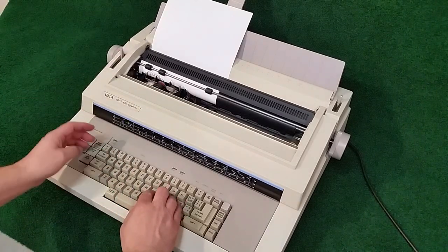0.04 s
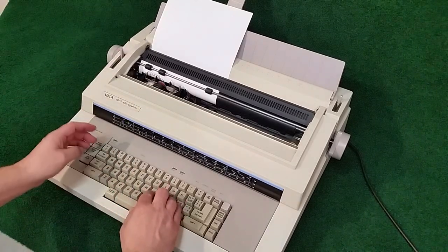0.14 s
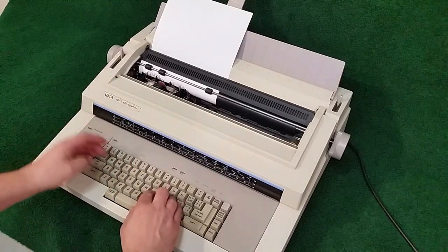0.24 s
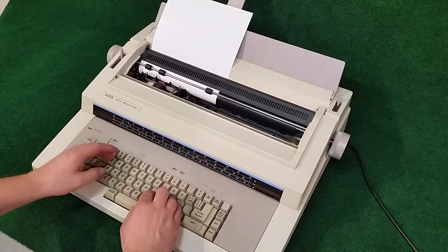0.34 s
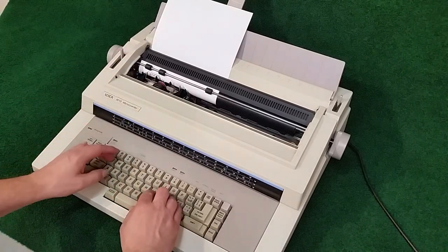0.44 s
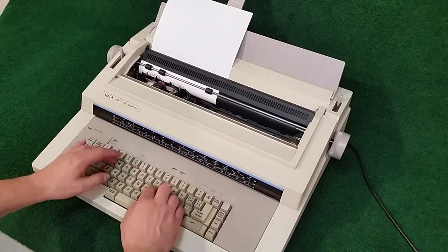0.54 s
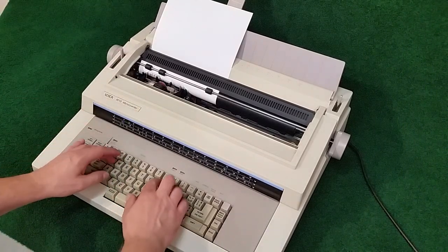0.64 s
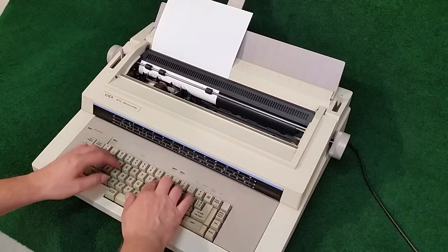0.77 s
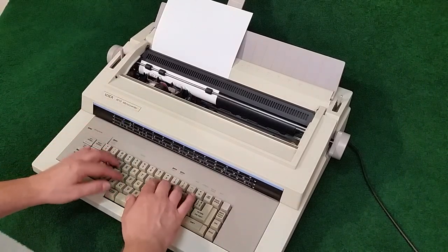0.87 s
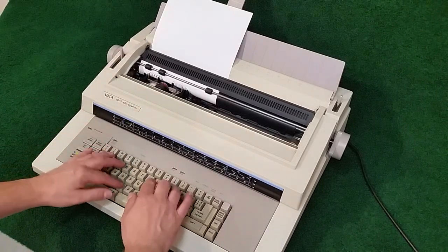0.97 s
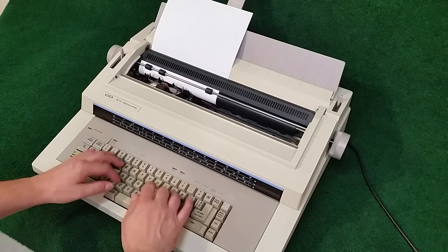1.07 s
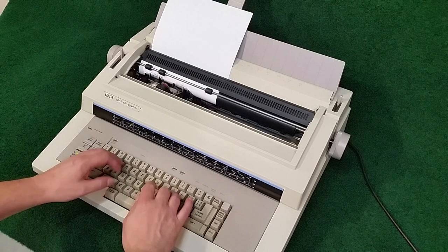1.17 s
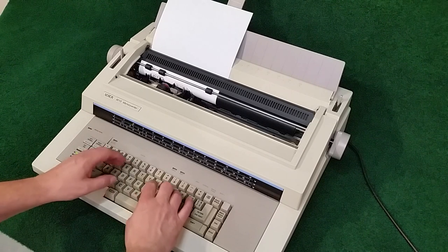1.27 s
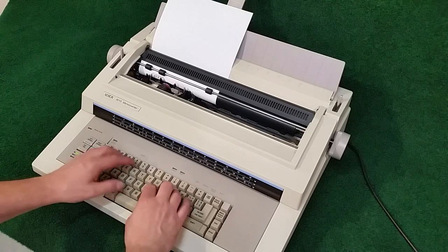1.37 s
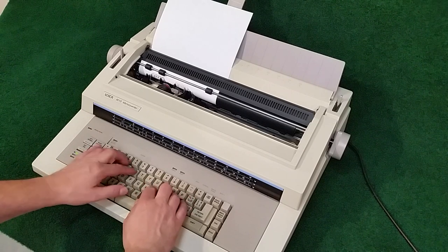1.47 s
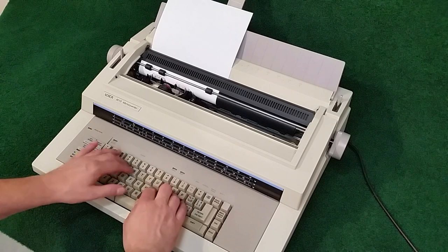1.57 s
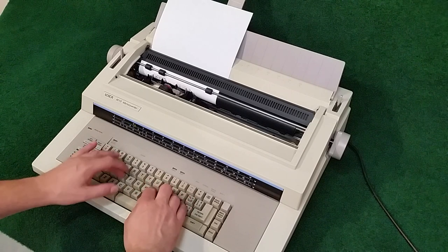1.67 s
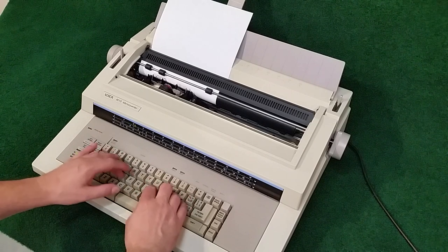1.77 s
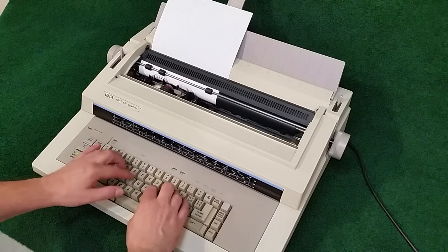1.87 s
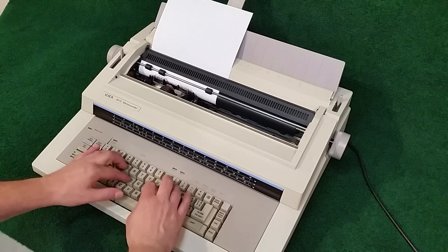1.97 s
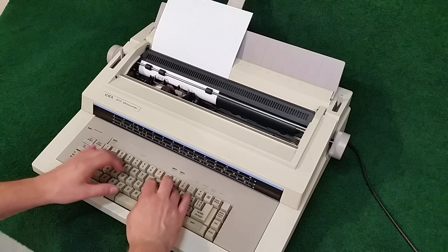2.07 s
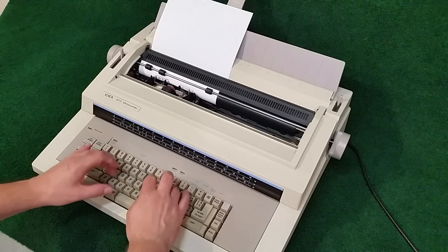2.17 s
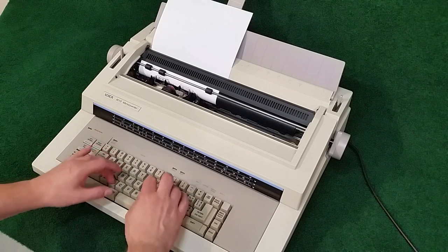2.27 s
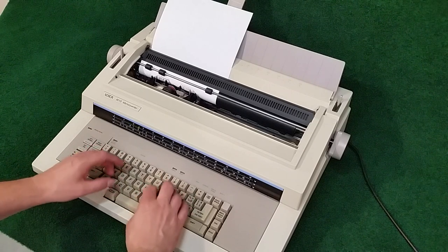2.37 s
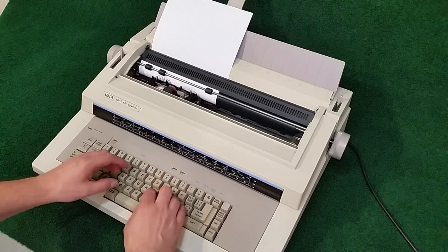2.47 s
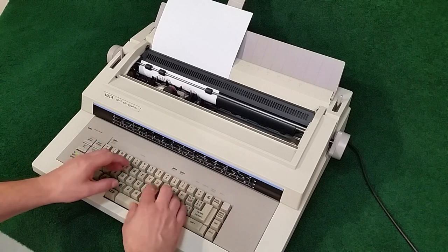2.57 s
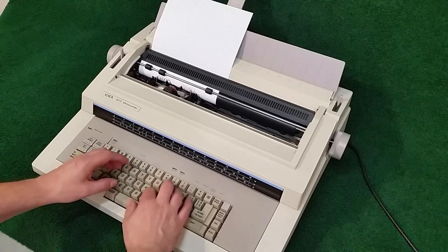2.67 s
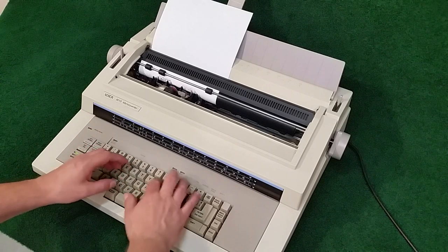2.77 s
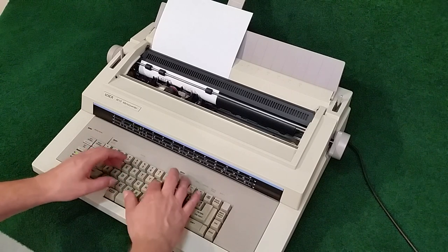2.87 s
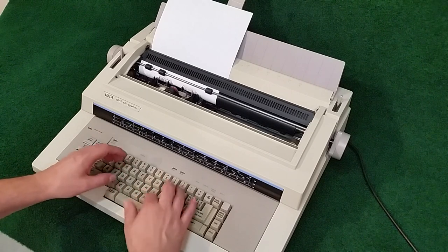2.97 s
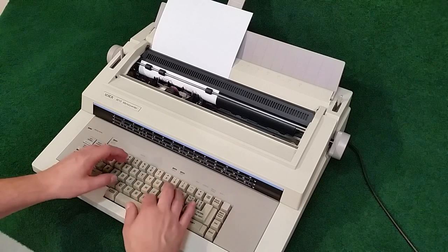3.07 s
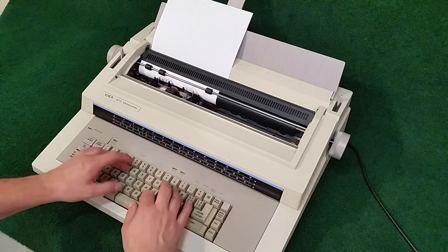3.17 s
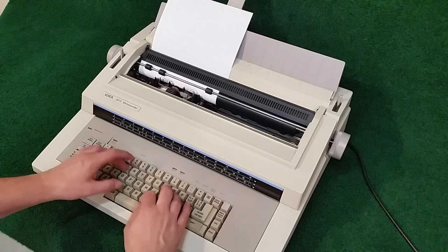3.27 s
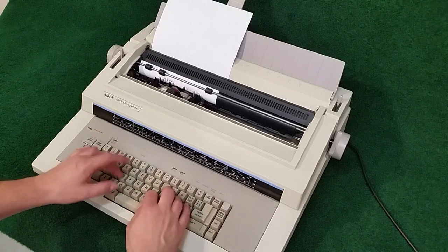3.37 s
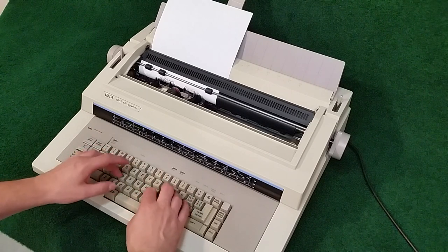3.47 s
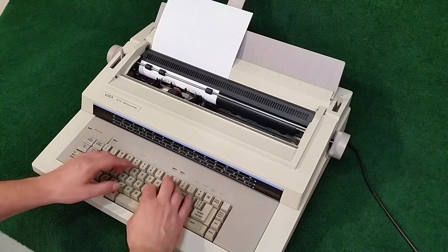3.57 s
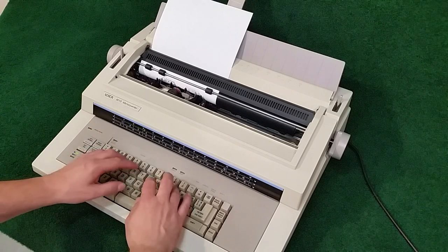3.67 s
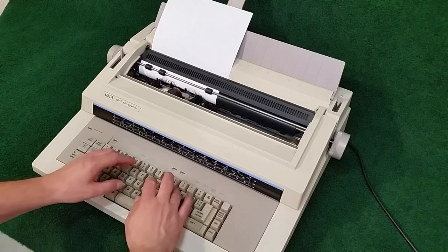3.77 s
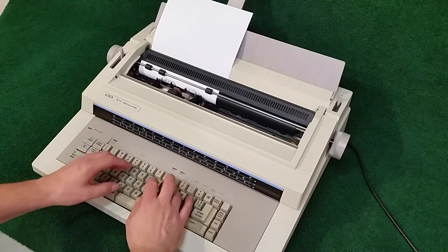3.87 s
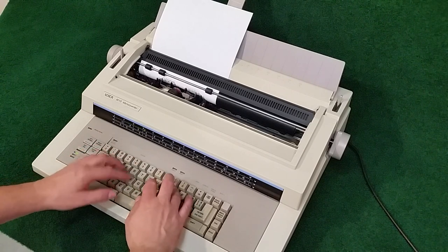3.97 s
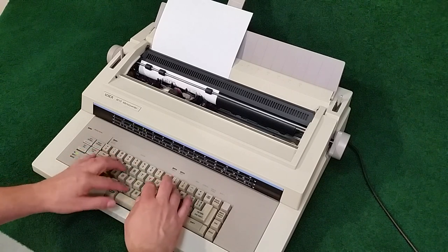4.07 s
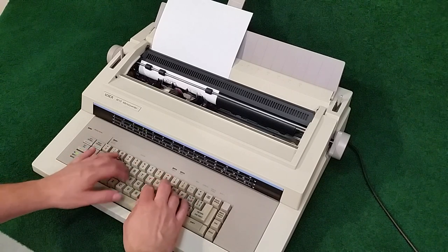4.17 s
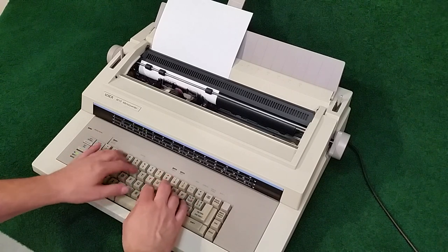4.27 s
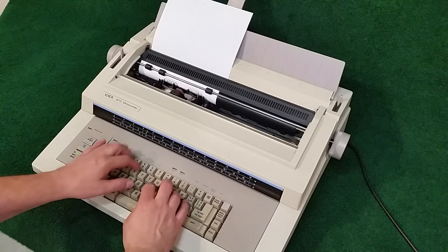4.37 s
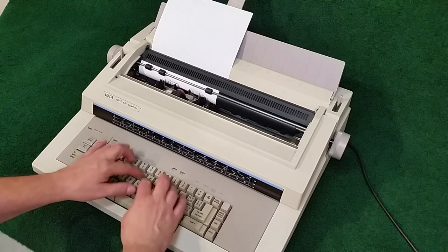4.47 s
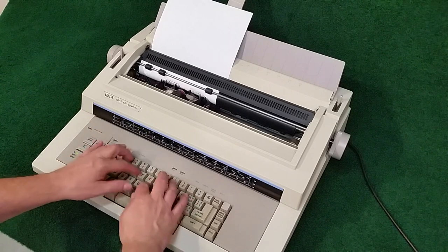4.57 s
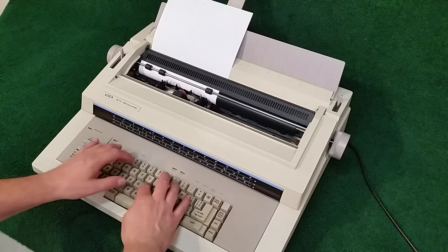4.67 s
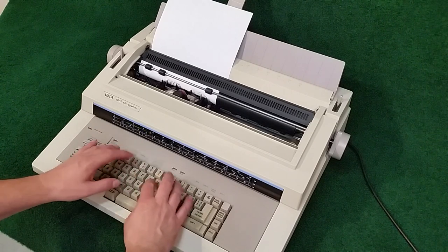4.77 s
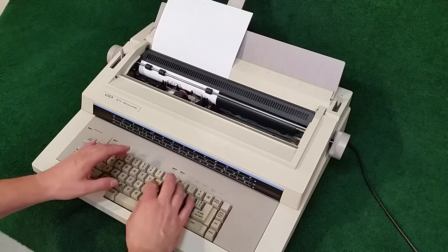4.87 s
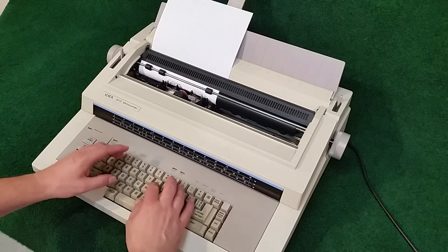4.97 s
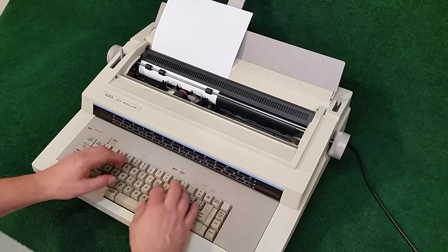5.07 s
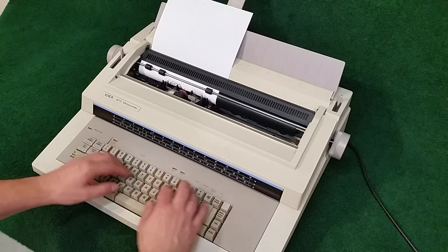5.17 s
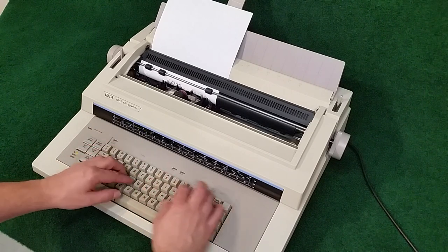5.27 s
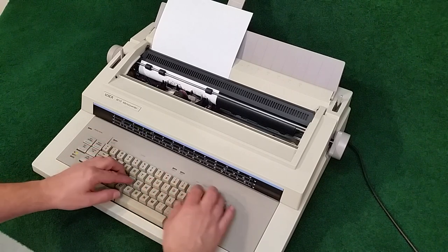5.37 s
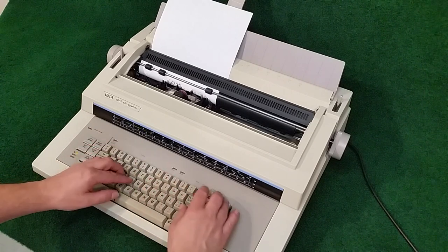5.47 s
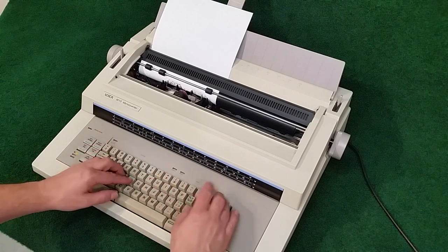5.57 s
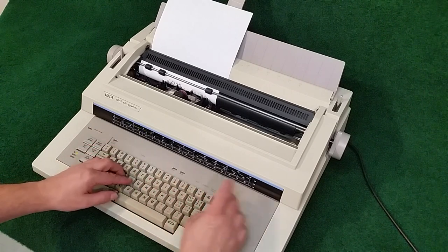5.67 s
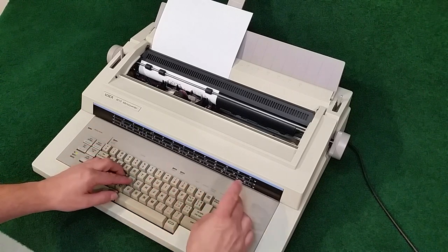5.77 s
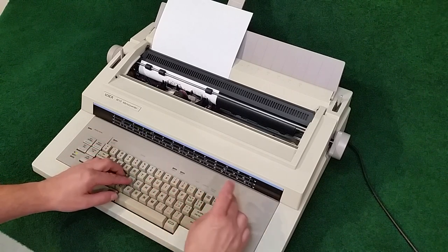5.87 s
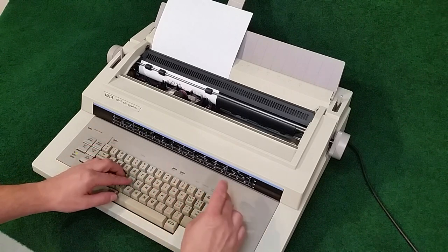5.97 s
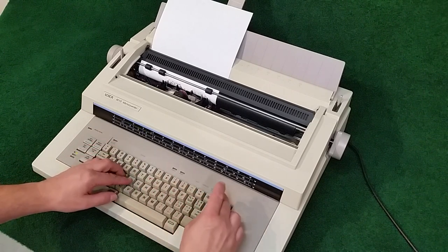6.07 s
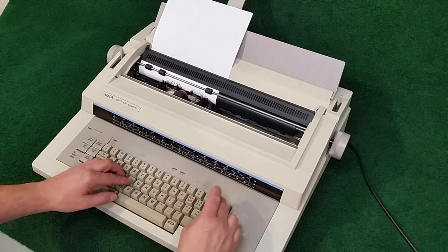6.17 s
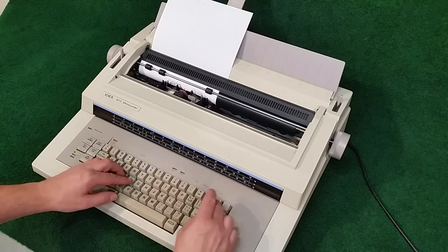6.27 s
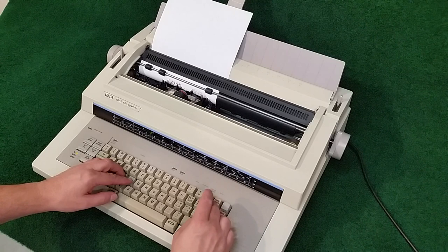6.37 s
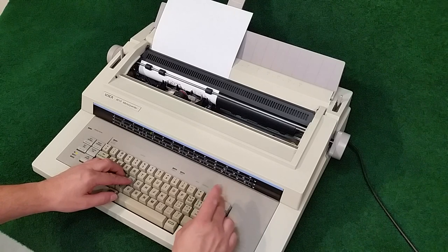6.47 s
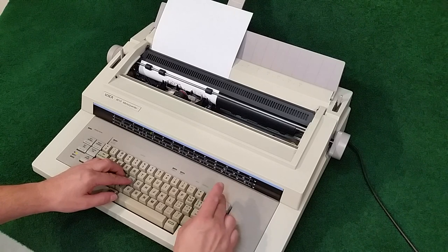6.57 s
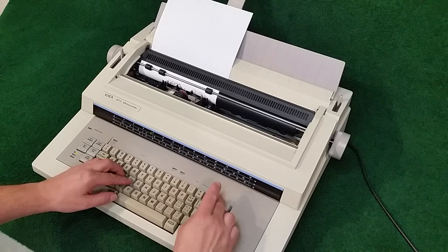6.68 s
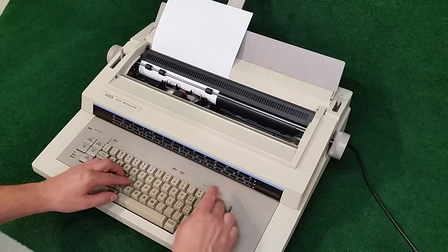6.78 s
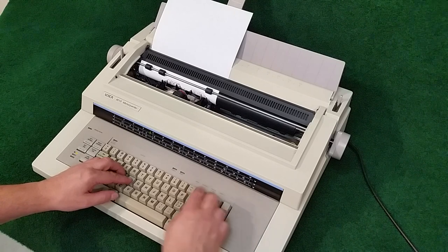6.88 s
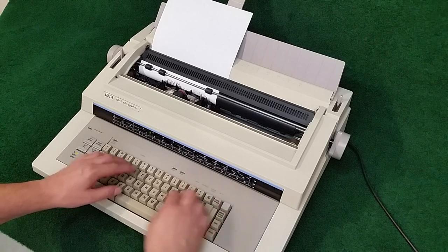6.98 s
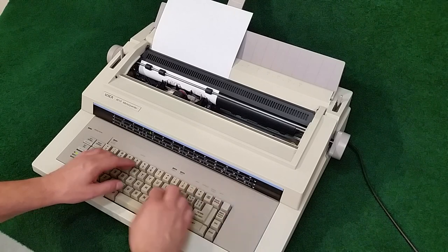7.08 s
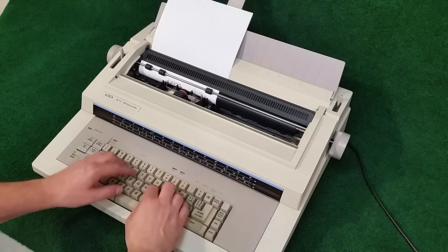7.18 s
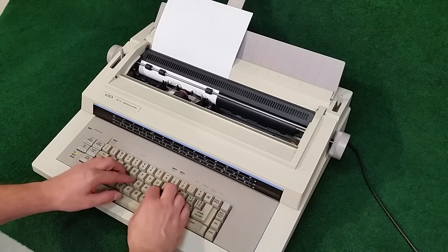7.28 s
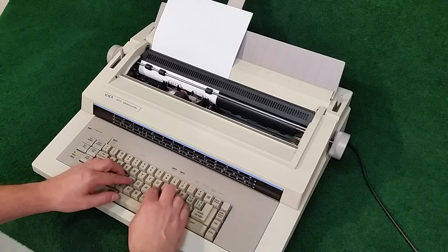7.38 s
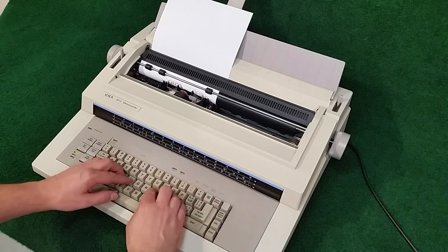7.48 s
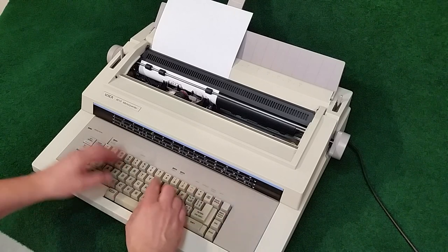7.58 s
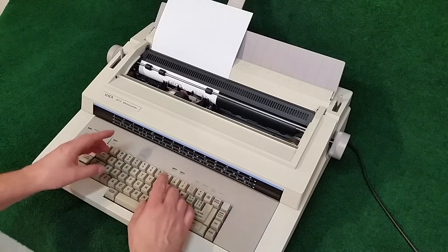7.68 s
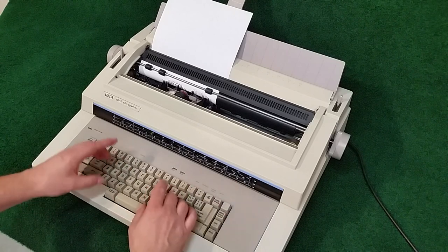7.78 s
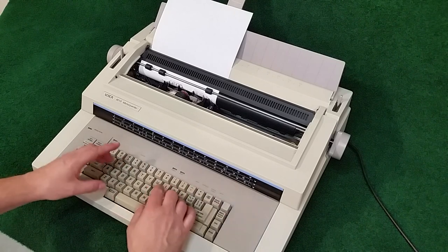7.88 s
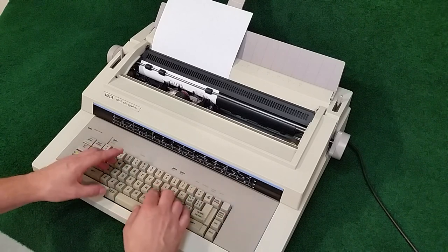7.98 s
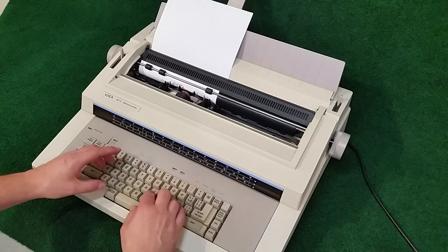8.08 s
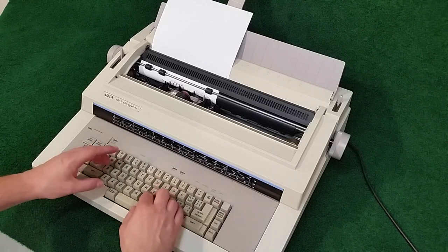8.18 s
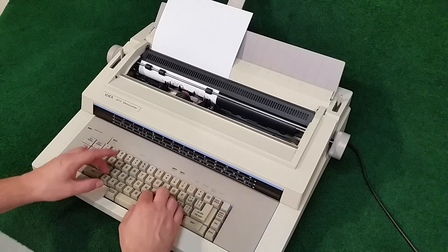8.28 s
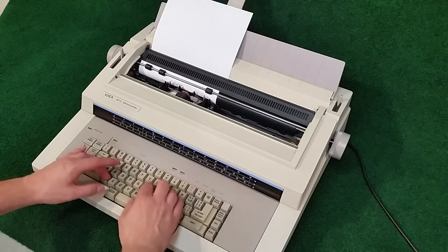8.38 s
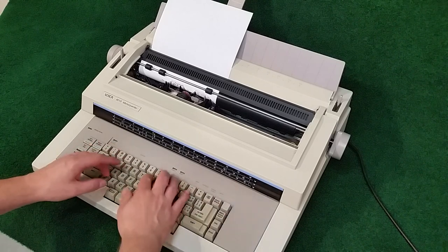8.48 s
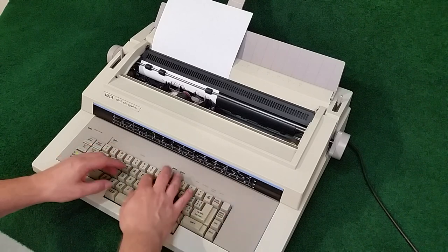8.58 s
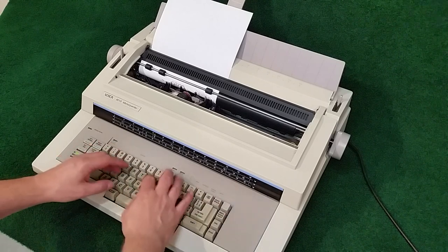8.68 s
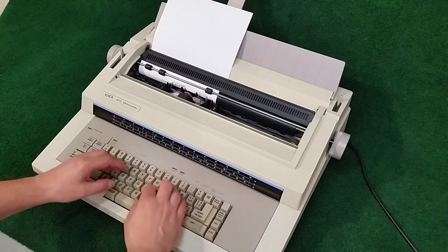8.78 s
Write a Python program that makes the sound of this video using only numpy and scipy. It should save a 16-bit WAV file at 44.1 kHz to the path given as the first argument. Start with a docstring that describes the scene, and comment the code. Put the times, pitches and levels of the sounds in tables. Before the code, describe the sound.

Close stereo sound of an electric typewriter in a small carpeted room. After a near-quiet start, letters strike in brisk, irregular runs, each a bright clack, hard crack and low case thud, with tiny motor whines between. Printing stops around five seconds; after a pause come light key knocks and a few scattered strikes. Low hum, soft air noise and faint hiss continue beneath.

```python
"""In a small carpeted room, two hands type on an electric daisy-wheel typewriter, close to two microphones.
For each letter the ribbon lifter clacks, the hammer cracks on the platen and rebounds, and the case thuds:
short bursts of noise ring resonances, and decaying sines make the crack. The wheel motor whines and keys knock.
The desk rumbles and a faint whistle passes once. Behind lie a low hum, a wavering drone, air noise,
and a band of hiss mostly in the left microphone."""
import sys
import numpy as np
from scipy import signal
from scipy.fft import rfft, irfft
from scipy.io import wavfile
from scipy.ndimage import uniform_filter1d

SR = 44100
rng = np.random.default_rng(int(sys.argv[2]) if len(sys.argv) > 2 else 0)


def transcribe(signal):
    """Save signal, clipped to [-1, 1], as a 16-bit WAV file at the path in sys.argv[1]."""
    frames = np.atleast_2d(signal).T
    limited = np.clip(frames, -1, 1)
    pcm = np.round(limited * 32767).astype(np.int16)
    wavfile.write(sys.argv[1], SR, pcm)


N = 389403
HZ = np.fft.rfftfreq(N, 1 / SR)


def amp(db):
    """Gain of a level in dB."""
    return 10 ** (np.asarray(db) / 20)


def evened(x):
    """Scales to rms 1, over both channels together."""
    return x / np.sqrt(np.mean(x ** 2) + 1e-20)


def read(points, hz):
    """Reads a spectrum table on a log-frequency axis."""
    f, value = np.transpose(points)
    return np.interp(np.log(hz + 1), np.log(f + 1), value)


def paired(x, likeness):
    """Makes the right channel share the left as two close microphones do."""
    left, other = rfft(x)
    same = np.clip(read(likeness, HZ), 0, 1)
    right = same * left + np.sqrt(1 - same ** 2) * other
    return irfft(np.array([left, right]), N)


# Likeness of the two microphones for the nearby machine; below 0 counts as 0: pitch_hz, likeness [0 to 1]
NEAR_LIKENESS = [(60, 0.96), (130, 0.96), (290, 1), (640, 0.87), (1410, 0.73), (3100, 0.24), (6820, -0.86),
                 (15000, -0.07)]


def noise(likeness=NEAR_LIKENESS):
    """White noise for the microphone pair."""
    return paired(rng.standard_normal((2, N)), likeness)


def resonator(x, hz, width):
    """One resonance of peak gain 1, its width in Hz."""
    return signal.lfilter(*signal.iirpeak(hz, hz / width, SR), x)


def ring(x, modes):
    """Sum of fixed resonances, each with its own peak level."""
    return sum(amp(db) * resonator(x, hz, width) for hz, width, db in modes)


def ring_twice(x, modes):
    """Sum of steeper resonances: each is followed by one twice as wide at the same pitch."""
    return sum(amp(db) * resonator(resonator(x, hz, width), hz, 2 * width) for hz, width, db in modes)


def bursts(times, db, t60, rise):
    """Envelope of blows that rise and die, at most 0.25 s long; level and t60 may differ per blow."""
    out, t = np.zeros(N), np.arange(SR // 4) / SR
    for s, level, fall in np.broadcast(times, amp(db), t60):
        part = out[round(s * SR):][:len(t)]
        shape = level * (1 - np.exp(-t / rise)) * amp(-60 * t / fall)
        part += shape[:len(part)]
    return out


def chatter(depth_db, size):
    """Noise whose loudness jumps from one contact of loose parts to the next; size in samples."""
    jumps = evened(uniform_filter1d(rng.standard_normal(N), size))
    return noise() * evened(amp(depth_db * jumps))


def lowpass(order, hz):
    """Butterworth low-pass sections."""
    return signal.butter(order, hz, fs=SR, output="sos")


# Letters struck on the platen, with relative levels:
# start_s, crack_db, wheel_rattle_db, cover_ring_db, lifter_lead_s (how much earlier it rises), lifter_clack_db
LETTERS = [(0.7541, -19, -32.5, -25, 0.026, -32), (0.9228, -18.5, -28.5, -13, 0.023, -24),
           (1.0319, -16, -26, -18, 0.022, -17), (1.1699, -16.5, -24.5, -38, 0.017, -18.5),
           (1.318, -20, -22, -11, 0.023, -13.5), (1.6705, -17, -28, -23, 0.023, -24.5),
           (1.7645, -16.5, -29, -12, 0.023, -17), (1.908, -13, -28, -13, 0.019, -21),
           (2.1177, -16, -21.5, -13.5, 0.023, -15.5), (2.2453, -14, -26, -28, 0.019, -19),
           (2.4501, -17, -23.5, -9, 0.024, -15.5), (2.8269, -17, -30, -25, 0.022, -28),
           (3.034, -17, -23, -30, .0232, -17.5), (3.1986, -13, -21.5, -24, 0.021, -20),
           (3.3835, -16.5, -22.5, -32.5, .0243, -15.5), (3.5877, -14, -23.5, -18, 0.022, -24),
           (4.1286, -18.5, -29.5, -31, 0.023, -25), (4.2784, -17, -26.5, -33, 0.024, -25),
           (4.411, -15, -22.5, -29, .0246, -16), (4.5029, -17.5, -25, -19.5, .0217, -17.5),
           (4.6881, -17.5, -20.5, -45, 0.023, -15.5), (4.781, -14.5, -24, -19, 0.022, -20.5),
           (7.2461, -20, -30.5, -18, 0.024, -24), (7.9664, -20, -33, -20, .0217, -33),
           (8.1529, -19, -23, -18.5, 0.023, -19), (8.5781, -19, -30, -20.5, 0.023, -27.5),
           (8.756, -17.5, -26, -13, 0.024, -17)]
# Partials of the crack, before the scatter from blow to blow: pitch_hz, level_db, t60_s
CRACK_PARTIALS = [(3152, -0.5, 0.0064), (2800, -14.5, 0.0023), (3720, -3, 0.0016), (4540, -4.5, 0.0029),
                  (5520, -11.5, 0.0022), (6940, -21.5, 0.00161), (10200, -5.5, .004), (13000, -3.5, 0.0039),
                  (14000, 4, 0.00203), (15300, 0, 0.0027)]
# The stop that the hammer falls back on: pitch_hz, width_hz, level_db
REST_MODES = [(2840, 70, -6), (1950, 150, 4), (5000, 550, -17.5)]
# The base, which thuds: pitch_hz, width_hz, level_db
BASE_MODES = [(91.6, 8.3, 6), (126.6, 47, 10.5), (143, 19, -1), (212.5, 7, -7), (297.5, 240, -7),
              (387, 150, -27.5)]
USUAL_CRACK_DB = -15
SNAP_DB, SNAP_GROWS = -18, 2  # crack partials from 8 kHz up at a usual blow; dB gained per dB of crack
REBOUND_S, REBOUND_DB, REBOUND_GROWS = 0.037, -23.5, 3.5  # delay; level and growth as for the snap
REBOUND_RATTLE_DB = -22  # relative to the ring of the rest
LINGER_DB, PANELS_DB, THUD_DB = -36.5, -26.5, -12  # alike for every blow


def cracks(s, crack_db, snap_db):
    """The hammer hits the platen: decaying sines, slightly retuned and rebalanced at each blow."""
    t, out = np.arange(600) / SR, np.zeros(N + 600)
    chance = rng.standard_normal((len(s), len(CRACK_PARTIALS), 2))
    for at, low_db, high_db, row in zip(s + 0.0003, crack_db, snap_db, chance):
        crack = 0
        for (hz, db, t60), (level_shift, pitch_shift) in zip(CRACK_PARTIALS, row):
            level_db = (low_db if hz < 8000 else high_db) + db + level_shift
            tone = np.sin(2 * np.pi * hz * (1 + 0.015 * pitch_shift) * t)
            crack = crack + amp(level_db - 60 * t / t60) * tone
        out[round(at * SR):][:600] -= crack * (1 - np.exp(-t / 0.00012))
    return out[:N]


def hammer():
    """A crack, early and lingering rattle, a later rebound on the rest, case ring and thud."""
    s, crack_db, rattle_db, covers_db = np.transpose(LETTERS)[:4]
    harder_db = crack_db - USUAL_CRACK_DB
    crack = cracks(s, crack_db, SNAP_DB + SNAP_GROWS * harder_db)
    rebound_db = REBOUND_DB + REBOUND_GROWS * harder_db
    shake = bursts(s + 0.00073, rattle_db + 4.0, 0.014, 0.00086)
    shake += bursts(s + 0.0058, rattle_db - 4.5, 0.036, 0.0021)  # a bounce soon after
    shake += bursts(s + 0.001, LINGER_DB, 0.26, 0.0094)
    shake += bursts(s + REBOUND_S, rebound_db + REBOUND_RATTLE_DB, 0.026, 0.0004)
    rest = bursts(s + REBOUND_S, rebound_db, 0.022, 0.00044)
    case = case_ring(s + 0.00056, PANELS_DB, covers_db, 0.051, 0.00101)
    thud = bursts(s + 0.0011, THUD_DB, 0.12, 0.017)
    rings = case + ring(rest * noise(), REST_MODES) + ring(thud * noise(), BASE_MODES)
    return crack + rattled(shake) + rings


# Colour of the rattling parts, only its shape counts: pitch_hz, level_db [dB per Hz]
RATTLE_COLOUR = [(410, -23), (700, -4), (1150, -20), (1330, 0.5), (1640, -7), (2000, 1), (2430, -4.5),
                 (2800, -3), (3070, -1), (5840, -15), (8210, -15), (10500, -1.5), (16000, -12)]


def rattled(envelope):
    """Loose metal and plastic parts chatter; the colour starts with the blow, not before it."""
    colour_db = np.maximum(read(RATTLE_COLOUR, np.abs(np.fft.fftfreq(4096, 1 / SR))), -80)
    log_gain = np.log(amp(colour_db))
    # the minimum-phase filter of this colour
    taps = np.fft.ifft(np.exp(np.conj(signal.hilbert(log_gain)))).real[:1024]
    shaken = envelope * chatter(1.5, size=60)
    return signal.oaconvolve(shaken, taps[None] / np.linalg.norm(taps), axes=1)[:, :N]


# Panels and covers of the case, for blows and the desk's buzz: pitch_hz, width_hz, level_db
CASE_MODES = [(578, 28, 2), (850, 20, -8), (1075, 15, -4.5), (1335, 51, 4), (2006, 86.4, 1),
              (2220, 114, -6), (2433, 53, -1), (2812, 70, 4), (3480, 97, -3), (3830, 120, -3),
              (4940, 75, -8.5)]


def case_ring(s, panels_db, covers_db, t60, rise):
    """Panels and covers differ in level; every blow rings all modes, each a little louder or softer at random."""
    shaking = noise()
    share_db = 3 * rng.standard_normal((len(s), len(CASE_MODES)))
    out = 0
    for mode, share in zip(CASE_MODES, share_db.T):
        part_db = panels_db if mode[0] < 1600 else covers_db
        out = out + ring(bursts(s, part_db + share, t60, rise) * shaking, [mode])
    return out


# Ribbon lifter dropping back, relative levels: start_s, clack_db, knock_db, clink_db
LIFTER_DROPS = [(1.4143, -17.5, -25, -26.5), (2.471, -15, -19, -32), (2.599, -31, -25, -47),
                (3.4007, -16, -27, -36), (3.7454, -35, -37, -48), (4.5995, -22, -22, -38),
                (4.8605, -28.5, -30, -19), (5.017, -32, -20, -50)]
# Small steel links of the lifter: pitch_hz, width_hz, level_db
LINK_MODES = [(10900, 490, -4.5), (10180, 478, -2), (8800, 1700, -21.5), (13000, 1100, -19),
              (14500, 1200, -23.5), (5760, 2460, -61.5), (3360, 3300, -16)]
# Key bed and frame: pitch_hz, width_hz, level_db
KEYBED_MODES = [(375, 138, 3.5), (528, 220, -1), (825, 99, -10), (1083, 68, -15)]
CLACK_T60, SECOND_TOUCH_S, SECOND_TOUCH_DB = 0.055, 0.0067, -17  # s; delay s; relative to the first touch
RISE_KNOCK_DB, RISE_CLINK_DB = -36, -27
USUAL_CLACK_DB = -19
LIFT_PANELS_DB = -25.5
LIFT_COVERS_DB, COVERS_GROW = -23, 0.61  # at a usual clack; dB gained per dB of clack


def lifter():
    """A bright clack in two quick touches, with case ring, a clink on the stop and a knock through the frame."""
    blow_s, lead_s, rise_db = np.transpose(LETTERS)[[0, 4, 5]]
    drop_s, drop_db, drop_knock_db, drop_clink_db = np.transpose(LIFTER_DROPS)
    rise_s = blow_s - lead_s
    s, clack_db = np.r_[rise_s, drop_s], np.r_[rise_db, drop_db]
    shake = bursts(s, clack_db, CLACK_T60, 0.00051)
    shake += bursts(s + SECOND_TOUCH_S, clack_db + SECOND_TOUCH_DB, CLACK_T60, 0.0008)
    knock = bursts(rise_s, RISE_KNOCK_DB, 0.12, 0.0035) + bursts(drop_s, drop_knock_db, 0.06, 0.001)
    clink = bursts(rise_s, RISE_CLINK_DB, 0.02, 0.00055) + bursts(drop_s, drop_clink_db, 0.031, 0.00048)
    covers_db = LIFT_COVERS_DB + COVERS_GROW * (clack_db - USUAL_CLACK_DB)
    case = case_ring(s, LIFT_PANELS_DB, covers_db, 0.081, 0.0014)
    clack = ring(shake * noise(), LINK_MODES)
    return clack + case + ring(knock * noise(), KEYBED_MODES) + ring(clink * noise(), REST_MODES)


# Runs of the wheel motor, lasting at least 10 ms before they fade: start_s, whine_db, length_s
WHEEL_RUNS = [(0.704, -45, 0.017), (1.093, -35, 0.054), (1.241, -34.5, 0.043), (1.461, -28, 0.016),
              (1.6, -36.5, 0.077), (1.855, -31.5, 0.035), (1.983, -29, 0.029), (2.073, -30, 0.056),
              (2.185, -40, 0.04), (2.368, -35, 0.079), (2.505, -28.5, 0.037), (2.788, -37.5, 0.05),
              (2.933, -39.5, 0.097), (3.118, -29, 0.02), (3.328, -37, 0.04), (3.541, -34, 0.023),
              (3.666, -30.5, 0.028), (4.036, -44.5, 0.057), (4.21, -35.5, 0.04), (4.555, -34, 0.062),
              (4.639, -30, 0.069), (4.725, -31, 0.017), (4.932, -30, 0.04), (6.877, -43.5, 0.073),
              (7.169, -37.5, 0.064), (7.4, -33, 0.038), (7.9, -41, 0.086), (8.1, -33.5, 0.043),
              (8.525, -39.5, 0.04), (8.668, -33, 0.025), (8.814, -28.5, 0.045)]
# Bands of the motor, each passed twice: pitch_hz, width_hz (first pass), level_db
MOTOR_BANDS = [(12730, 410, -2.5), (10240, 900, -14), (14820, 1000, -27), (1960, 430, -21), (866, 1350, -6)]


def wheel():
    """The stepping motor hisses in a narrow high band, throbbing with its steps, and hums in the frame."""
    t, on = np.arange(N) / SR, np.zeros(N)
    for s, db, length in WHEEL_RUNS:
        end = max(length, 0.01)
        on += amp(db) * np.interp(t - s, [0, 0.002, end, end + 0.01], [0, 1, 0.7, 0])
    throb = 1 + 0.34 * np.sin(2 * np.pi * 190 * t)  # 190 steps per second
    return ring_twice(on * throb * chatter(3.8, size=90), MOTOR_BANDS)


# Keys reaching their stop or springing back, relative levels: start_s, knock_db, click_db
KEY_HITS = [(0.039, -42, -52), (0.713, -30, -54), (1.442, -27, -42), (1.712, -29, -35), (1.969, -25, -37),
            (2.062, -21.5, -30.5), (2.761, -35.5, -46), (2.777, -35, -42), (2.859, -28, -29),
            (2.924, -32, -34), (3.108, -38, -34), (3.122, -29, -32), (3.308, -26.5, -39), (3.66, -27, -43),
            (4.222, -44, -42), (4.943, -30, -42), (6.685, -59, -56), (6.847, -33, -60), (6.862, -34, -52),
            (6.887, -30, -60), (6.908, -37, -58), (6.949, -29.5, -54), (7.141, -28.5, -45),
            (7.204, -29, -37), (7.34, -41, -32.5), (7.416, -31.5, -41), (7.504, -32.5, -44),
            (7.522, -43, -39), (7.872, -29, -46), (8.086, -23, -47), (8.498, -30, -52)]
KEY_T60, TICK_DB = 0.11, -5.5  # knock decay s; tick relative to the click


def keys():
    """A dull knock on the key bed, a plastic click and a faint tick."""
    s, knock_db, click_db = np.transpose(KEY_HITS)
    plastic = [(1305, 430, 6.5), (1940, 530, -4.0), (2750, 490, -3.5)]  # pitch_hz, width_hz, level_db
    knocking = bursts(s, knock_db, KEY_T60, 0.002) * chatter(2.4, size=150)
    knock = ring(knocking, KEYBED_MODES + [(1140, 200, -18)])
    click = ring(bursts(s, click_db, KEY_T60 / 2, 0.001) * noise(), plastic)
    tick = ring(bursts(s, click_db + TICK_DB, 0.048, 0.00037) * noise(), LINK_MODES)
    return signal.sosfilt(lowpass(4, 1700), knock) + signal.sosfilt(lowpass(2, 3500), click) + tick


JOLT_DB, JOLT_RISE_S, JOLT_SETTLE_S = -50.5, 0.034, 0.16  # each blow shakes the desk; time constants


def desk():
    """Each blow leaves a low rumble that settles slowly; loose parts buzz when it grows strong."""
    blow_s = np.array([row[0] for row in LETTERS])
    since = np.maximum(np.arange(N) / SR - blow_s[:, None], 0)
    jolts = (1 - np.exp(-since / JOLT_RISE_S)) * np.exp(-since / JOLT_SETTLE_S)
    level = amp(JOLT_DB) * np.sqrt(np.sum(jolts, axis=0))
    shaking = ring(chatter(2.5, size=1500), BASE_MODES + KEYBED_MODES)
    rumble = level * evened(signal.sosfilt(lowpass(3, 1200), shaking))
    damped = [(hz, 7.7 * width, db) for hz, width, db in CASE_MODES]  # parts that touch damp the ring
    loose = ring(chatter(3.0, size=400), damped)
    buzz = signal.sosfilt(lowpass(2, 4500), loose) * level ** 2 * amp(47)
    return rumble + buzz


# A thin whistle: start_s, pitch_hz, level_db [rms]
WHISTLE_PATH = [(8.28, 10750, -92), (8.32, 11000, -80), (8.36, 11150, -76), (8.41, 11230, -73),
                (8.44, 11150, -77), (8.47, 10950, -92)]


def whistle():
    """A faint sine that arches up and down in pitch."""
    s, hz, db = np.transpose(WHISTLE_PATH)
    t = np.arange(N) / SR
    level = amp(np.interp(t, s, db, -140, -140)) * np.sqrt(2)
    return level * np.sin(2 * np.pi * np.cumsum(np.interp(t, s, hz)) / SR)


# Decay of the carpeted room: pitch_hz, t60_s
ROOM_DECAY = [(100, 1), (700, 0.187), (2000, 0.49), (5000, 0.39), (13000, 0.41)]
# Likeness of the two microphones for room sound; clipped to 0 to 1: pitch_hz, likeness
ROOM_LIKENESS = [(60, 1), (180, 0.99), (550, 0.67), (1650, -0.027), (4970, -1.74), (15000, -0.9)]


def room(x):
    """Sparse taps of random sign, one in every 20 samples, each band dying at its own speed."""
    taps = np.zeros((2, N))
    at = np.arange(300, SR // 2, 20)
    places = at + rng.integers(0, 20, (2, len(at)))
    np.put_along_axis(taps, places, rng.choice([-1., 1.], (2, len(at))), 1)
    hz, t, z = signal.stft(paired(taps, ROOM_LIKENESS)[:, 300:SR // 2], SR, nperseg=256)
    dying = amp(-60 * t / read(ROOM_DECAY, hz)[:, None])
    tail = signal.istft(z * dying, SR, nperseg=256)[1]
    tail = np.pad(tail, ((0, 0), (300, 0))) / np.linalg.norm(tail[0])  # 300 samples before the first echo
    return signal.fftconvolve(x, tail, axes=1)[:, :N]


# Room modes under distant machinery, each passed twice: pitch_hz, width_hz (first pass), level_db (relative)
HUM_MODES = [(94.8, 12.4, -10.5), (119.5, 6.8, 1), (129.1, 21, -6), (151.8, 7.5, -5.5), (180.2, 12, -10.5),
             (205.4, 4.34, -4), (221.8, 3.5, -11.5), (239.5, 12, -9), (290.3, 16.6, -13), (378, 13, -25)]
# Colour of the air noise, only its shape counts: pitch_hz, level_db [dB per Hz]
AIR_COLOUR = [(20, -2.5), (30, 11), (40, -0.5), (70, 1), (300, 0), (500, -1.5), (900, -5.5), (1300, -16.5),
              (2000, -24.5), (2700, -31.5), (5600, -58), (6500, -41), (8000, -51.5), (10000, -40),
              (16000, -35.5)]
# Balance of the air noise: pitch_hz, left_minus_right_db
AIR_BALANCE = [(60, 4.5), (700, -3.5), (1300, 0), (8000, 3), (15000, -4)]
# Slow level changes of hum, drone and air: start_s, level_db
SWELL = [(0, 1.5), (.7, 1.5), (3.9, 2), (5.95, 1.5), (6.4, -0.5), (6.6, 1.5), (7.7, 0.5), (8.83, 2)]
# Colour of the hiss, only its shape counts: pitch_hz, level_db [dB per Hz]
HISS_COLOUR = [(1590, -57.5), (2700, -33), (3010, -17), (3490, -7.5), (3790, -7.5), (4110, 0), (4510, 0.5),
               (4690, -0.5), (5090, -7.5), (5600, -36.5), (7280, -57.5), (12300, -120)]
HUM_DB, DRONE_HZ, DRONE_DB = -45, 52.9, -54  # centres, before the waver, balance and swell
AIR_DB, HISS_DB = -53.5, -60  # before the swell; before the left-right balance


def background():
    """Hum in the room modes, a wavering drone, broad air noise, and hiss mostly on the left."""
    t = np.arange(N) / SR
    level_waver, pitch_waver = [evened(uniform_filter1d(uniform_filter1d(v, 2500), 2500))
                                for v in rng.standard_normal((2, N))]
    drone_phase = 2 * np.pi * np.cumsum(DRONE_HZ + 2.58 * pitch_waver) / SR
    drone = amp(DRONE_DB + 3.8 * level_waver) * np.sin(drone_phase) * np.sqrt(2)
    modes = sum(ring_twice(noise(ROOM_LIKENESS), [mode]) for mode in HUM_MODES)
    hum = (amp(HUM_DB) * evened(modes) + drone) * amp([[-1.1], [1.1]])  # left, right
    side_db = read(AIR_BALANCE, HZ) / 2
    air_gain = amp(read(AIR_COLOUR, HZ) + np.array([side_db, -side_db]))
    air = evened(irfft(rfft(noise(ROOM_LIKENESS)) * air_gain, N))
    hiss = evened(irfft(rfft(rng.standard_normal(N)) * amp(read(HISS_COLOUR, HZ)), N))
    hiss = hiss * amp(HISS_DB + np.array([[5.5], [-17.0]]))  # left, right
    return (hum + amp(AIR_DB) * air) * amp(np.interp(t, *np.transpose(SWELL))) + hiss


# Colour of the two microphone ports: pitch_hz, left_minus_right_db
PORT_BALANCE = [(60, -2.5), (1300, -2.5), (2800, 0), (3500, -3), (4500, 11), (6500, 4.5), (8500, 2.5),
                (10500, -9), (13000, -7.5), (15500, 1)]


def scene():
    """The machine and its room reach two ports of different colour, the left one first."""
    machine = hammer() + lifter() + wheel() + keys() + desk() + whistle()
    machine = machine + amp(-8.0) * room(machine)
    side_db = read(PORT_BALANCE, HZ) / 2
    # 2 samples late up to 4 kHz, a constant phase above
    lag = np.exp(-2j * np.pi * np.minimum(HZ, 4000) * 2 / SR)
    ports = np.array([amp(side_db), amp(-side_db) * lag])
    return irfft(rfft(machine) * ports, N) + background()


def record(dry):
    """A steep low-pass at 15950 Hz: nothing sounds above it."""
    taps = signal.firwin(255, 15950, window=("kaiser", 9), fs=SR)
    return signal.oaconvolve(dry, taps[None], "same")


dry = scene()
out = record(dry)
transcribe(out)
```